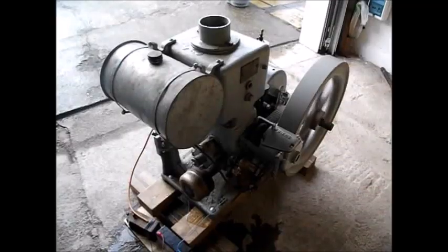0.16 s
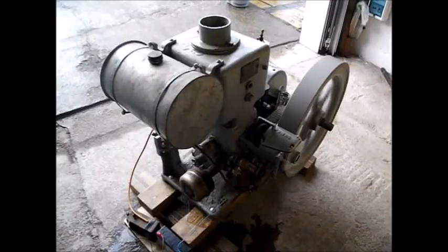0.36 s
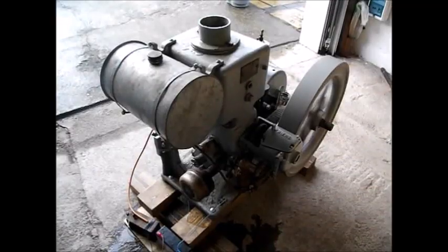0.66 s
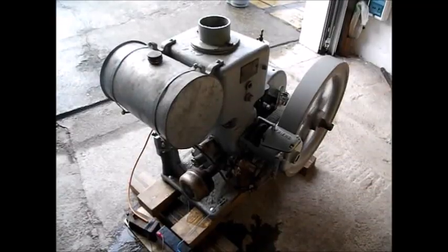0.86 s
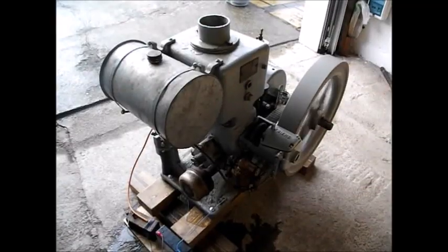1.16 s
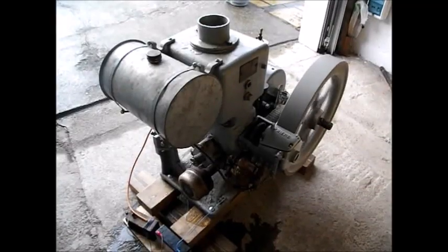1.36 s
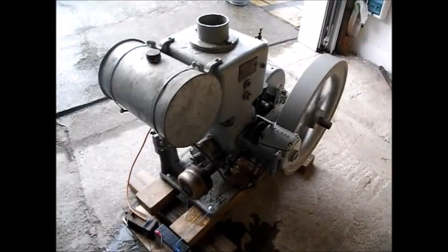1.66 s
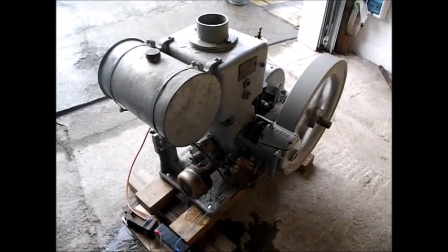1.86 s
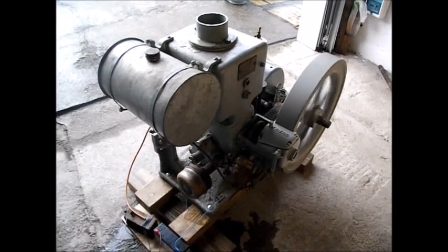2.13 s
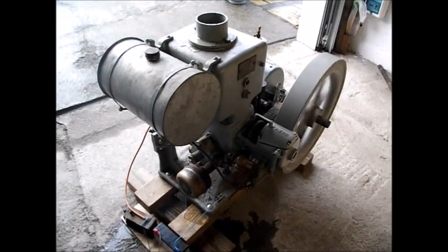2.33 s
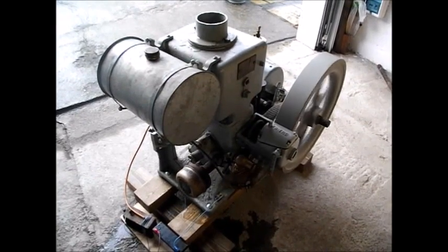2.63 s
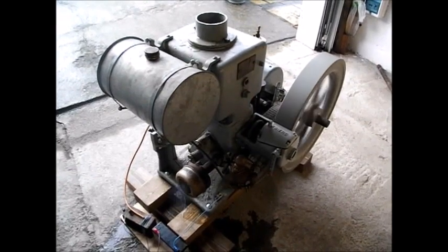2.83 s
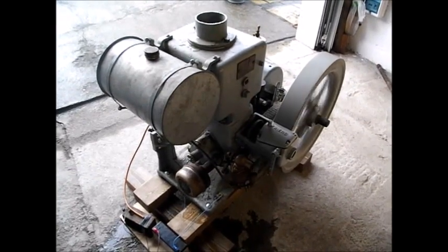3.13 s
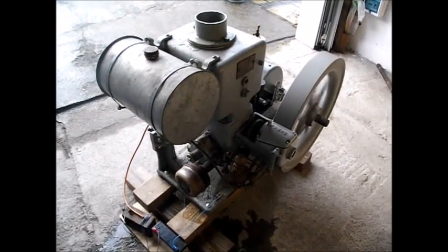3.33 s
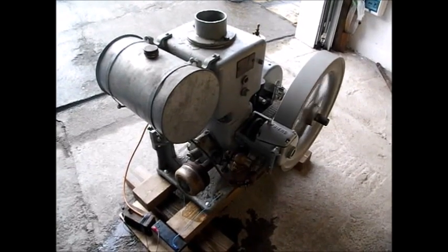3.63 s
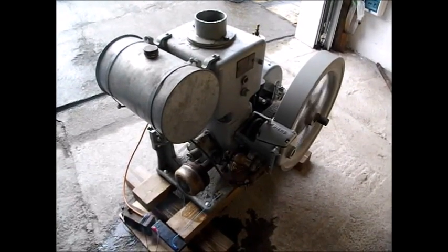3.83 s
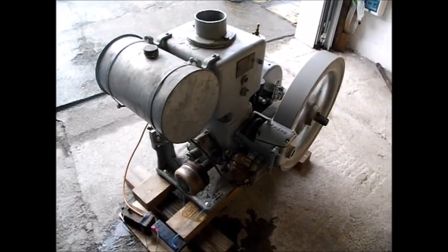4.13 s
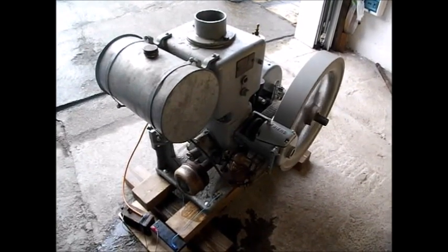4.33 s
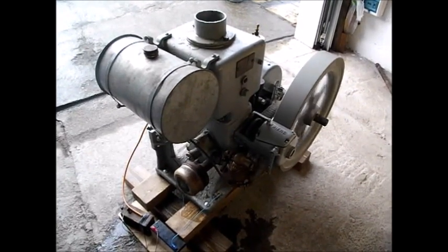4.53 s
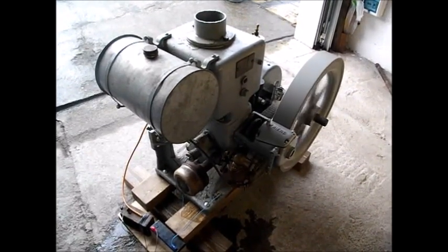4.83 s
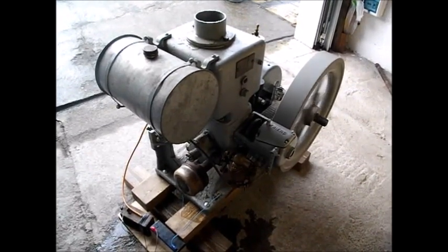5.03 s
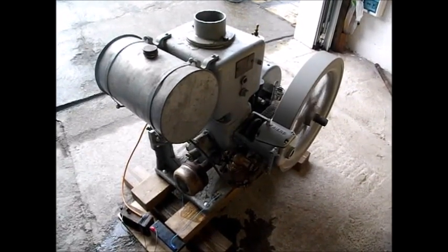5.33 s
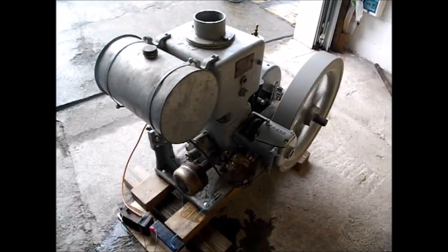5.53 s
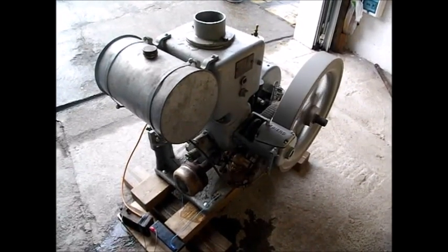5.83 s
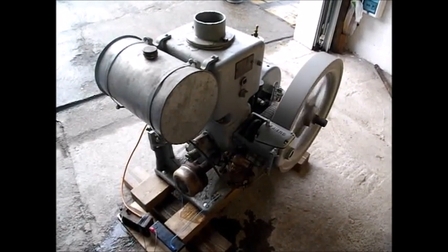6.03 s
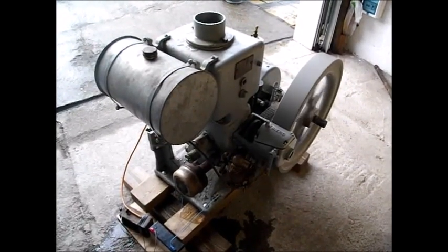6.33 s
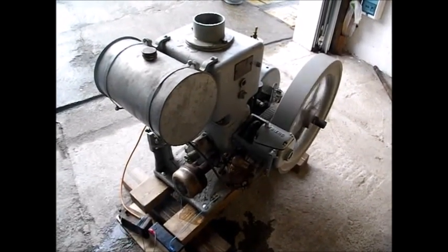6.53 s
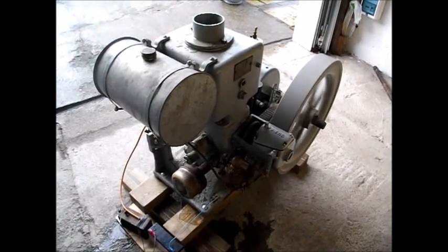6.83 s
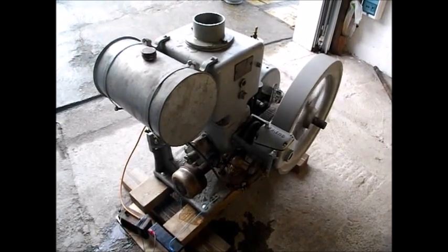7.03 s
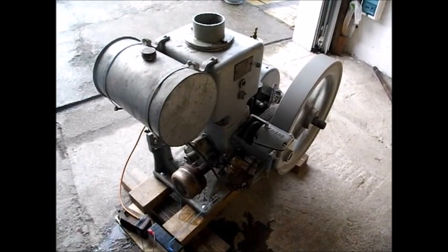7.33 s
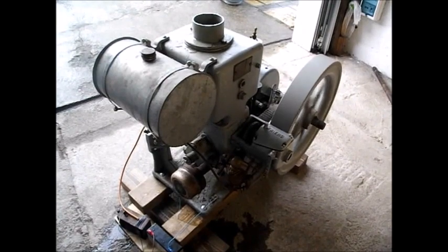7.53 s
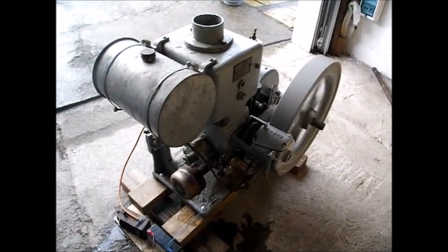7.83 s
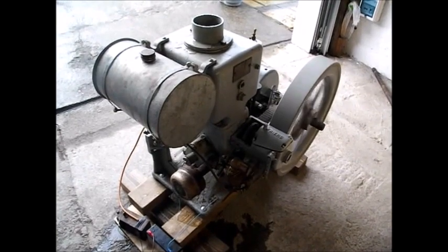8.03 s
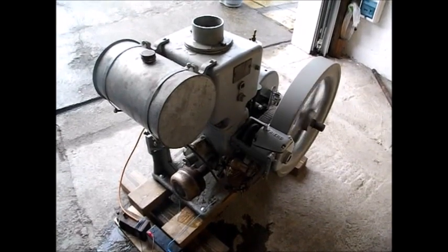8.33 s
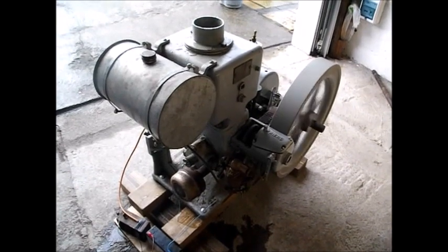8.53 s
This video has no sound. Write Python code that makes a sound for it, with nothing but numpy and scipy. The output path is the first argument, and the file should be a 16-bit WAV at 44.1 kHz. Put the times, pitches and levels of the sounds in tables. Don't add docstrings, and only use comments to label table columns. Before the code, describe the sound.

Close recording of a slow stationary engine: loud overloaded bangs a little over once a second, with gear rumble, metallic ticks and snorting air between.

```python
import sys
import numpy as np
from scipy import signal
from scipy.fft import rfft, irfft, next_fast_len
from scipy.io import wavfile
from scipy.ndimage import uniform_filter1d, map_coordinates

SR = 44100
rng = np.random.default_rng(int(sys.argv[2]) if len(sys.argv) > 2 else 0)


def rack_gain(trim_db):
    fader = np.asarray(trim_db, float)
    return 10 ** (fader / 20)


def wav_out(sig):
    wavfile.write(sys.argv[1], SR, np.round(np.clip(np.atleast_2d(sig).T, -1, 1) * 32767).astype(np.int16))


N = 382347
TIME = np.arange(N) / SR

# start in seconds, blast level in dB, blast length in seconds, first push in dB.
FIRINGS = [
    (0.6113, 14, 0.0089, 10.5),
    (1.482, 14.5, 0.012, 12.5),
    (2.4097, 13, 0.013, 4.5),
    (3.3761, 10, 0.011, 0),
    (4.266, 12.5, 0.011, 10),
    (5.154, 6, 0.017, -7.5),
    (6.056, 12, 0.011, 7.5),
    (6.957, 12, 0.012, 1),
    (7.895, 8, 0.012, -3.5),
]
# share of the cycle (0-1), gear rumble in dB, skid hum in dB.
CYCLE = [
    (0, -7, -2),
    (0.058, -8.5, -26.5),
    (.16, -3, -7.5),
    (0.399, -0.5, -2.5),
    (.5, 0.5, -5),
    (0.599, -1.5, -2),
    (0.799, -0.5, -3),
    (.9, 2, -1.5),
    (0.998, -1, -2.5),
]
# peak in seconds, level in dB, note in Hz.
INLET_TICKS = [(0.197, -8.5, 2940), (0.2638, -12.5, 3040), (0.3713, -9.5, 3040), (1.0465, -5, 3010),
               (1.1164, -6.5, 3030), (1.2292, -8, 2980), (1.942, -6, 3030), (2.0145, -9, 2340),
               (2.1384, -6, 2820), (2.8534, -3, 3090), (2.9715, -8, 2970), (3.1094, -6.5, 2900),
               (3.8055, -2, 2990), (3.8954, -8, 2910), (4.0057, -5.5, 3040), (4.705, -6.5, 2950),
               (4.781, -7, 2400), (4.9024, -14, 2830), (5.6058, -3, 3040), (5.6828, -11, 2940),
               (5.791, -8, 2950), (6.505, -3, 2850), (6.5732, -13, 3220), (6.7242, -10.5, 2860),
               (7.4239, -5, 3030), (7.4965, -10, 2664), (7.606, -9, 3091), (8.3259, -6, 2820),
               (8.4456, -6.5, 3150), (8.565, -10, 2990)]
# frequency in Hz, width in Hz, level in dB.
CASTINGS = [(435.3, 21, 2), (570, 29, 1), (737.5, 14, -1), (859, 5.6, -4), (1051, 54, -7.5), (1300, 9, -2),
            (1518, 30, -11.5), (1868, 7.4, -2.5), (2337, 4.8, -5), (2664, 11, -7), (3950, 5.4, -16.5),
            (4250, 6.2, -12.5)]
# frequency in Hz, level in dB per Hz.
BRIGHT_KNOCK = [(600, -29.5), (1500, -4), (2400, 11.5), (3500, 19), (6000, -12)]
# frequency in Hz, level in dB per Hz.
DULL_KNOCK = [(150, -18.5), (400, 5.5), (900, -4), (1400, -2), (2200, -8.5), (5000, -25.5)]
# frequency in Hz, level in dB per Hz.
FLOOR = [(15, -0.5), (28, -4), (40, -4.5), (57, -4), (100, -12), (140, -29.5), (300, -52.5)]


def unit(x):
    return x / np.sqrt(np.mean(x ** 2) + 1e-20)


def along(points, hz):
    f, v = np.transpose(points)
    return np.interp(np.log(hz + 1), np.log(f + 1), v)


def filtered(x, response):
    m = next_fast_len(N + SR // 2)
    return irfft(rfft(x, m) * response(np.fft.rfftfreq(m, 1 / SR)), m)[..., :N]


def modes(table):
    def response(f):
        total = 0
        for k, (centre, width, db) in enumerate(table):
            damping = 1j * f * width
            total = total + (-1) ** k * rack_gain(db) * damping / (centre * centre - f * f + damping)
        return total
    return response


def noise(spectrum):
    return unit(filtered(rng.standard_normal(N), lambda hz: rack_gain(along(spectrum, hz))))


def ringing(table):
    return unit(filtered(rng.standard_normal(N), modes(table)))


def wobble(rate):
    return map_coordinates(rng.standard_normal(int(N * rate / SR) + 4), [TIME * rate])


def bursts(times, levels_db, rise, fall):
    envelope = np.zeros(N + SR)
    t = np.arange(SR // 5) / SR
    for s, db, slow in zip(times, levels_db, np.broadcast_to(fall, len(times))):
        envelope[round(s * SR):][:len(t)] += rack_gain(db) * (1 - np.exp(-t / rise)) * np.exp(-t / slow)
    return envelope[:N]


def humps(rows, place):
    coarse = place[::32]
    total = sum(rack_gain(db) * np.exp(-((coarse - centre) / width) ** 2) for centre, db, width in rows)
    return np.interp(TIME, TIME[::32], total)


def patchy(x, depth_db):
    z = signal.stft(x, nperseg=256)[2]
    field = uniform_filter1d(rng.standard_normal(z.shape), 3, 0)
    field = unit(uniform_filter1d(field, 8, 1))
    return unit(signal.istft(z * rack_gain(depth_db * field), nperseg=256)[1][:N])


def firings():
    unheard = (-.21, 8.84)
    return np.r_[unheard[0], np.array(FIRINGS)[:, 0], unheard[1]]


def crank():
    s = firings()
    return np.interp(TIME, s, np.arange(len(s))) % 1


def heard_gain_db(times):
    # ducked level in dB, hold in seconds, climb back in seconds, rest level in dB.
    ducks = [
        (-29, 0.21, .15, -19),
        (-29, 0.14, 0.26, -19),
        (-32, 0.35, .17, -19.5),
        (-29.5, .07, 0.21, -20.5),
        (-28.5, 0.031, 0.2, -20.5),
        (-30, 0.31, 0.15, -17),
        (-26.5, 0.15, 0.13, -20),
        (-30, 0.25, 0.17, -19.5),
        (-29, 0.12, 0.27, -19),
        (-23.5, .1, 0.14, -18.5),
    ]
    duck_s, creep_db_per_s, drift_db_per_s = 0.041, 5.5, 0
    s = firings()
    low_db, held, climb, rest_db = np.transpose(ducks)
    back = s[:-1] + held + climb
    at = [s[:-1] + duck_s, s[:-1] + held, back, s[1:]]
    db = [low_db, low_db + creep_db_per_s * held, rest_db, rest_db + drift_db_per_s * (s[1:] - back)]
    return np.interp(times, np.ravel(at, 'F'), np.ravel(db, 'F'))


def gears(turn):
    # frequency in Hz, level in dB per Hz.
    rumble_spectrum = [(120, -21), (170, 2.5), (320, 4), (500, -2.5), (1000, 0), (2000, -5.5), (3500, -13),
                       (6000, -29)]
    share, rumble_db, _ = np.transpose(CYCLE)
    teeth = rack_gain(2.2 * wobble(90) + 1.4 * wobble(15))
    ring = unit(filtered(teeth * rng.standard_normal(N), modes(CASTINGS)))
    rumble = patchy(teeth * noise(rumble_spectrum), depth_db=1.5)
    return rack_gain(np.interp(turn, share, rumble_db) - 6.5) * (rumble + 0.9 * ring)


def breath_of_ports(turn):
    # share of the cycle (0-1), level in dB, width as a share.
    snorts = [
        (.089, 10, 0.021),
        (.21, 3, 0.056),
        (.78, 3, .07),
        (1, 7.5, 0.057),
    ]
    breeze_db = -0.5
    puff_db, puff_lead_s, puff_s = -6.5, 0.0046, 0.026
    puffs = [(s - puff_lead_s, db + puff_db - heard_gain_db(s), puff_s) for s, db, _ in INLET_TICKS]
    return rack_gain(breeze_db) + humps(snorts, turn) + humps(puffs, TIME)


def port_air(turn):
    # frequency in Hz, level in dB per Hz.
    rush_spectrum = [(500, -38), (1200, -21.5), (2200, -6.5), (3000, 2), (4000, -8.5), (6000, -15.5)]
    rush = patchy(rack_gain(0.46 * wobble(120)) * noise(rush_spectrum), depth_db=2.5)
    return rack_gain(-18.5) * breath_of_ports(turn) * rush


def groaning(turn):
    # start in seconds, length in seconds, level as heard in dB.
    groans = [(0.113, 0.057, -20), (0.267, 0.079, -23), (0.58, 0.062, -19.5), (1.101, 0.078, -15.5),
              (1.463, 0.048, -22), (1.998, 0.06, -28), (2.297, 0.06, -16.5), (2.85, .03, -20),
              (3.228, 0.13, -22), (4.168, 0.075, -18.5), (4.78, 0.14, -20.5), (5.054, 0.12, -16.5),
              (5.708, 0.031, -31.5), (5.957, 0.042, -19), (6.606, 0.04, -24.5), (6.87, .044, -14.5),
              (7.377, 0.081, -24), (7.8, 0.076, -17), (8.23, 0.065, -27), (8.453, 0.088, -26)]
    share, _, hum_db = np.transpose(CYCLE)
    swells = [(s + length / 2, db - 4.5 - heard_gain_db(s), 0.49 * length) for s, length, db in groans]
    return rack_gain(np.interp(turn, share, hum_db) - 4.5 + 0.65 * wobble(19)) + humps(swells, TIME)


def skids_and_tank(turn):
    # frequency in Hz, width in Hz, level in dB.
    skid_modes = [(232, 51, -1), (290.4, 20.4, 6.5)]
    # frequency in Hz, width in Hz, level in dB.
    tank_modes = [(167.1, 6.5, 0)]
    return groaning(turn) * ringing(skid_modes) + rack_gain(-12.5) * ringing(tank_modes)


def floor_shake(turn):
    # share of the cycle (0-1), level in dB.
    sway = [(0, 4.5), (.1, -5), (.17, -9.5), (.4, -7.5), (.48, 7.5), (.68, 0), (.76, -4.5), (1, 0)]
    return rack_gain(np.interp(turn, *np.transpose(sway)) - 17.5 + 3.2 * wobble(5.6)) * noise(FLOOR)


def drone():
    # centre in seconds, level in dB over the running noise, width in seconds.
    swells = [(.08, -6, 0.1), (.47, 0.5, .07), (.6, 2.5, 0.015), (1.05, -5.5, 0.29), (1.45, 2.5, 0.035),
              (1.72, -2, 0.081), (2.0, -1, 0.094), (2.36, -4, 0.12), (2.8, -2.5, .16), (3.32, 0, 0.065),
              (3.6, -12.5, 0.24), (4.18, 0.5, 0.089), (4.75, -13, 0.018), (5.05, -18, .15),
              (5.5, -2.5, 0.24), (5.82, -0.5, 0.044), (6.04, 0, 0.03), (6.25, -9.5, 0.12),
              (6.73, -4.5, .09), (6.91, -4.5, .04), (7.34, -2, 0.17), (7.85, 1.5, .05), (8.2, -8, .2),
              (8.6, -3.5, 0.06)]
    frame_hz, between_swells_db = 203.8, -11
    phase = 2 * np.pi * frame_hz * TIME + 0.25 * wobble(25) + 0.6 * wobble(6)
    level = (rack_gain(between_swells_db) + humps(swells, TIME)) * rack_gain(2.5 + 1.6 * wobble(16))
    return level * np.sin(phase)


def running():
    turn = crank()
    return gears(turn) + port_air(turn) + skids_and_tank(turn) + floor_shake(turn) + drone()


def capsule(hz):
    # frequency in Hz, width in Hz, level in dB.
    capsule_modes = [(2967, 347, 16.5), (2670, 2350, -3)]
    ring = 1 + modes(capsule_modes[:1])(hz) + modes(capsule_modes[1:])(hz)
    return ring / (1 + (hz / 4300) ** 6)


def contact_notes(s, hz, blur):
    near = hz[np.searchsorted((s[1:] + s[:-1]) / 2, TIME)]
    phase = 2 * np.pi * np.cumsum(near) / SR + blur * wobble(300)
    return np.sin(phase) / np.abs(capsule(near))


def contacts(table):
    s, db, hz = np.transpose(sorted(table))
    return s, db - heard_gain_db(s), hz


def after_firings(delay, db, hz):
    late, loud = rng.standard_normal((len(FIRINGS), 2)).T
    s = np.array(FIRINGS)[:, 0] + delay + 0.003 * late
    return list(zip(s, db + 0.92 * loud + heard_gain_db(s), hz + 0 * s))


def thuds():
    # peak in seconds, level in dB, note in Hz.
    cam_and_rod = [(.0703, -20.5, 1530), (.3435, -15.5, 1300), (.5092, -11, 1256), (.9171, -23.5, 1496),
                   (1.1993, -10, 1265), (1.304, -14, 1283), (1.3751, -11.5, 1300), (1.8077, -29, 1593),
                   (1.9348, -20, 1850), (2.282, -10, 1500), (2.7645, -15.5, 1240), (2.862, -14, 1470),
                   (3.1038, -19.5, 1868), (3.2489, -10, 1530), (3.6894, -17, 998), (3.8138, -14, 1370),
                   (3.9795, -17, 1271), (4.1455, -10.5, 1430), (4.8701, -10, 1300), (5.0381, -12.5, 1462),
                   (5.599, -20, 1770), (5.9494, -14, 1245), (6.378, -21.5, 1840), (6.6661, -15.5, 1300),
                   (6.8346, -13, 1510), (7.249, -19.5, 990), (7.494, -15, 1857), (7.7682, -13.5, 1438),
                   (8.2358, -15, 1430), (8.367, -10, 1895)]
    exhaust_seat = after_firings(delay=0.14, db=2, hz=1269)
    s, db, hz = contacts(cam_and_rod + exhaust_seat)
    blow = bursts(s - .004, db + 4, rise=0.0036, fall=0.0099)
    ring = rack_gain(11.5) * filtered(blow * rng.standard_normal(N), modes(CASTINGS))
    return blow * (contact_notes(s, hz, blur=2.0) + 0.47 * noise(DULL_KNOCK)) + ring


def valve_ticks():
    # peak in seconds, level in dB.
    rattles = [(0.1756, -14), (0.5238, -9.5), (1.269, -15.5), (1.3, -12), (1.3749, -10), (2.2207, -2.5),
               (2.6951, -11), (2.866, -2), (2.8915, -4.9), (3.5815, -21.5), (3.6058, -11), (4.5342, -17.5),
               (4.871, -8.5), (5.096, -16), (5.2395, -11), (5.483, -11), (5.585, -9.5), (6.6661, -6.5),
               (7.2332, -10.5), (7.3901, -5), (7.685, -3), (7.9823, -11.5), (8.1805, -7), (8.2395, -12),
               (8.35, -4)]
    # delay in seconds, level in dB over the running noise.
    after_ticks = [
        (.084, 10),
        (.2, 8),
    ]
    # frequency in Hz, width in Hz, level in dB.
    stem_modes = [(2363, 140, 2), (1840, 70, -4)]
    tick_s, tick_hz, scatter_hz = .0019, 2960, 70
    loose = [(s, db, tick_hz + scatter_hz * rng.standard_normal()) for s, db in rattles]
    faint = [row for delay, db in after_ticks for row in after_firings(delay, db, tick_hz)]
    s, db, hz = contacts(INLET_TICKS + loose + faint)
    swell = bursts(s - tick_s - .001, db + 13.8, rise=.004, fall=1.3 * tick_s)
    ticks = swell * (contact_notes(s, hz, blur=.5) + .08 * noise(BRIGHT_KNOCK))
    s, db, _ = contacts(INLET_TICKS[1::3])
    stem = bursts(s - .012, db - 6, rise=0.0062, fall=0.011) * ringing(stem_modes)
    return ticks + stem


def exhaust():
    # frequency in Hz, level in dB per Hz.
    blast_spectrum = [(100, -21), (300, -10.5), (1000, 0), (2000, 3), (3000, -4), (6000, 3)]
    # frequency in Hz, width in Hz, level in dB.
    pipe_modes = [(2946, 150, 0)]
    snap_db = [-7.5, -8.5, -7, -13.5, -8.5, -5, -7, 3.5, -4.5]
    s, blast_db, length, push_db = np.transpose(FIRINGS)

    push = np.zeros(N)
    u = np.arange(SR // 20) / SR / 0.00041
    for start, db in zip(s, push_db):
        push[round(start * SR):][:len(u)] -= rack_gain(db + 18.5) * u * (1 - u / 2) * np.exp(-u / 1.39)

    snap = bursts(s - .0006, blast_db + snap_db, rise=0.00018, fall=0.0018) * noise(BRIGHT_KNOCK)
    crack = bursts(s, blast_db + 4.5, rise=0.00033, fall=0.006) * noise(DULL_KNOCK)
    gas = noise(blast_spectrum) + 0.25 * ringing(pipe_modes)
    blast = bursts(s + 0.0024, blast_db + 18.5, rise=0.0098, fall=length) * gas
    gusts = rack_gain(3.5 * wobble(160))
    thump = bursts(s + 0.0091, blast_db - 0.5, rise=0.034, fall=0.043) * noise(FLOOR)
    low_tone = np.sin(2 * np.pi * 27 * TIME)
    low_swell = bursts(s + .02, blast_db - 10.5, rise=.03, fall=.07) * low_tone
    return low_swell + push + snap + crack + gusts * blast + thump


def workshop(x):
    # frequency in Hz, decay time to -60 dB in seconds.
    decay = [(200, 0.58), (2000, 0.34), (6000, 0.053)]
    hz, t, z = signal.stft(rng.standard_normal(SR // 2), SR, nperseg=256)
    tail = signal.istft(z * rack_gain(-60 * t / along(decay, hz)[:, None]), SR, nperseg=256)[1]
    return signal.fftconvolve(np.pad(x, (300, 0)), tail / np.linalg.norm(tail))[:N]


def scene():
    hits = thuds() + valve_ticks() + exhaust()
    return (running() + hits + rack_gain(-14) * workshop(hits))[None]


def narrow(x):
    hz, t, z = signal.stft(x, SR, nperseg=1024)
    edge_hz = 5110 + 250 * (uniform_filter1d(rng.standard_normal(len(t)), size=3) > .2)
    luck = uniform_filter1d(rng.standard_normal(z.shape[-2:]), size=8, axis=0)
    luck = unit(uniform_filter1d(luck, size=4, axis=1))
    kept = luck < np.interp(hz, [3600, 4300, 5300], [5, 2, 1.4])[:, None]
    low_pass = 1 + (hz[:, None] / edge_hz) ** 80
    return signal.istft(kept * z / low_pass, SR, nperseg=1024)[1][..., :N]


def roll_off(x):
    return signal.sosfilt(signal.butter(12, 15700, fs=SR, output="sos"), x)


def record(dry):
    # frequency in Hz, level in dB per Hz.
    hiss_spectrum = [(2500, -12.5), (4000, -1), (6000, -2)]
    x = filtered(dry, capsule) * rack_gain(heard_gain_db(TIME)) + rack_gain(-47.5) * noise(hiss_spectrum)
    top = 0.96
    x = x / (1 + np.abs(x / top) ** 8) ** (1 / 8)
    x = narrow(x) - .0048
    x = np.clip(x, -1, 1) * (TIME > .005)
    return roll_off(x)


dry = scene()
out = record(dry)
wav_out(out)
```